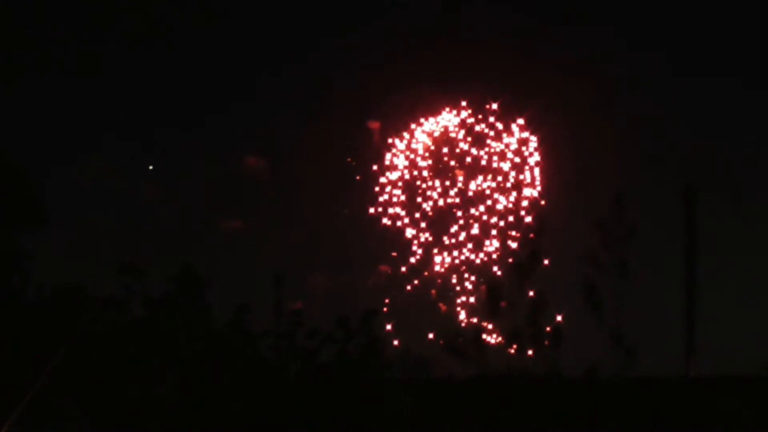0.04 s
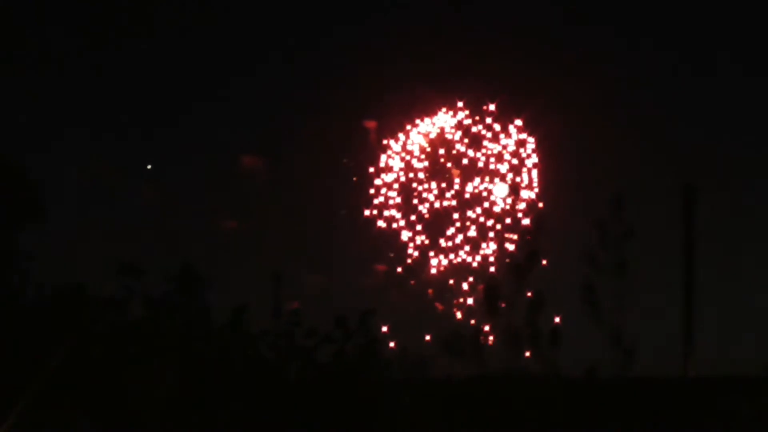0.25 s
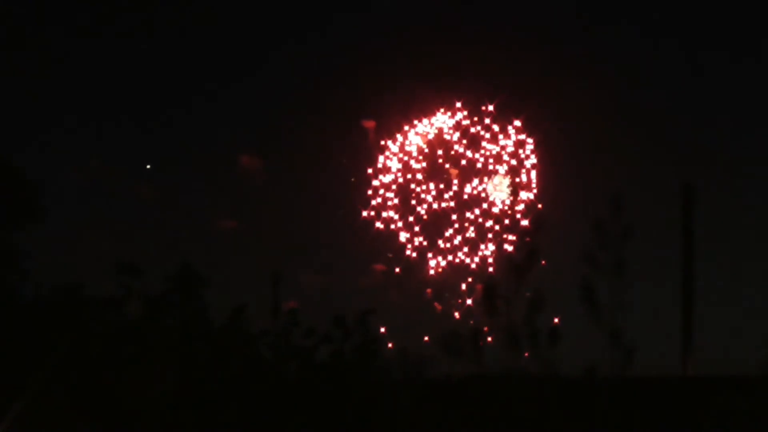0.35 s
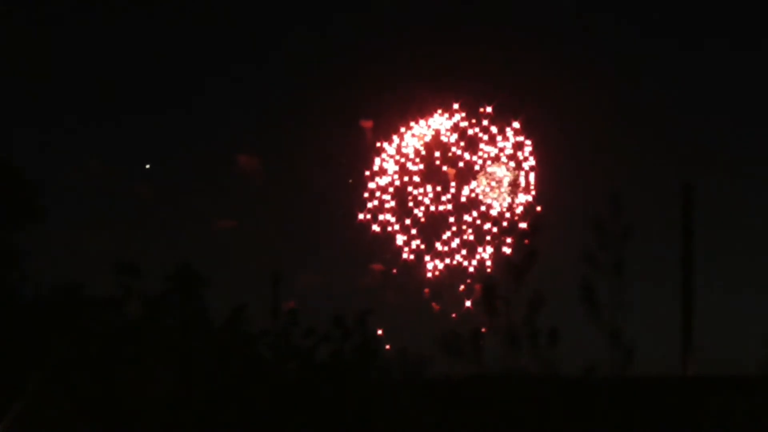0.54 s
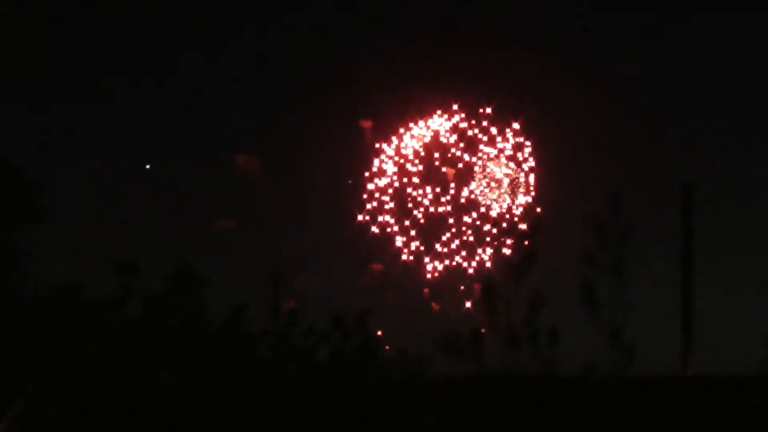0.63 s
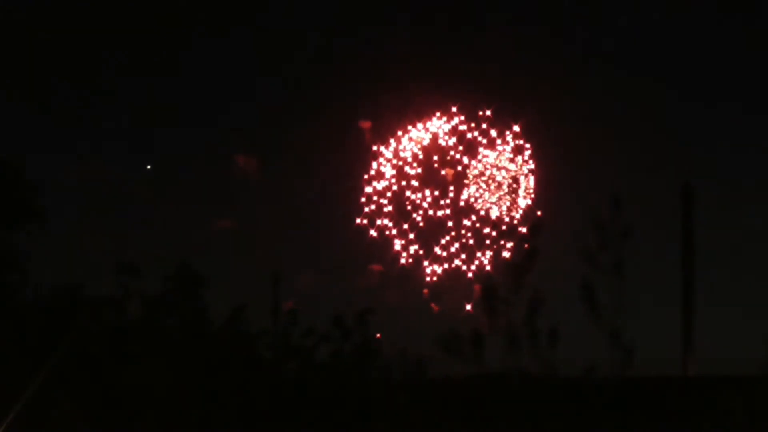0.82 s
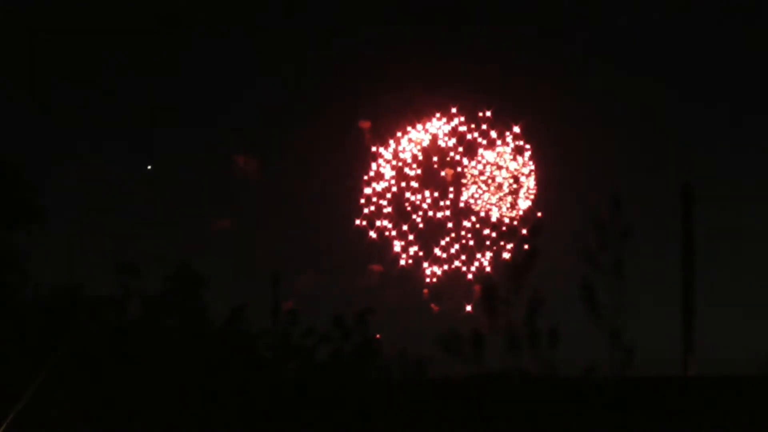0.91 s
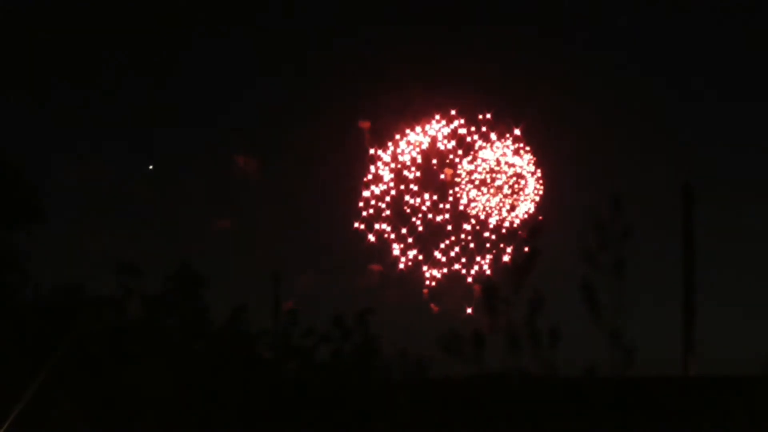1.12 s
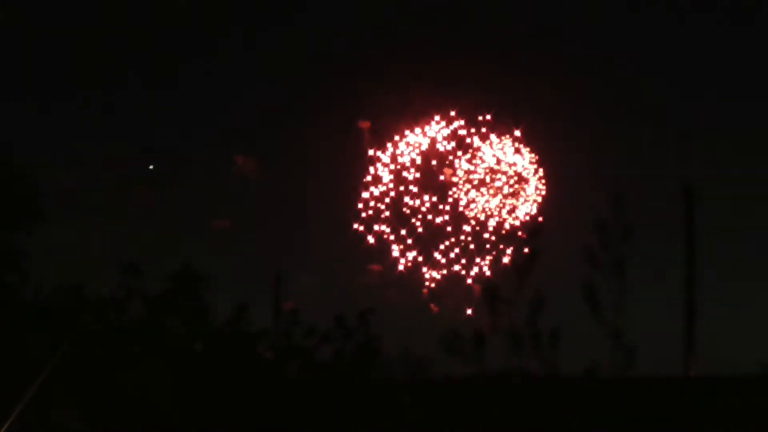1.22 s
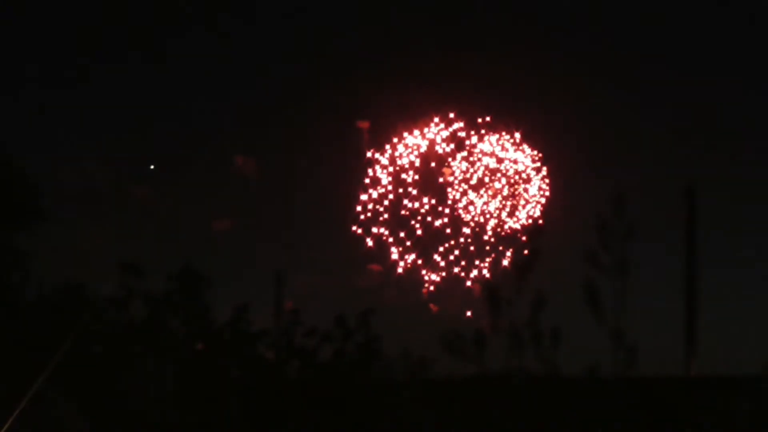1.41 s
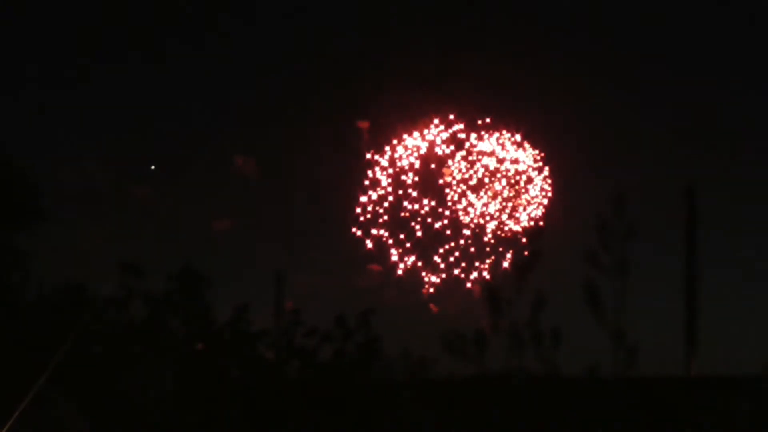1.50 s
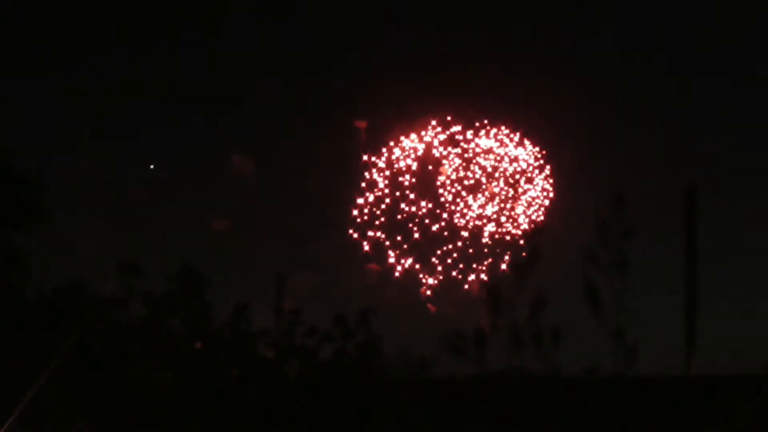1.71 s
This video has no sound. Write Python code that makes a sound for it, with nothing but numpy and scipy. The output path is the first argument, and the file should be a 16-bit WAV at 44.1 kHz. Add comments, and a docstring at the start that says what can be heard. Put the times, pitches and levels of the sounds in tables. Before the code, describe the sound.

Distant fireworks outdoors at night: after a brief quiet of far traffic hum and faint hiss, a loud bang overloads the stereo microphone, rumbling back in echoes, followed by two progressively weaker, duller bursts.

```python
"""Night air over a city, heard by a microphone pair: far traffic and hiss, then a large firework shell bursts
far away and high up. Its shock, a blast wave dulled by the air, drives the recorder into clipping and rolls
back from buildings and ground as random weak echoes (rumble) and short trains of rounded cycles (thumps). A
faint tick rings close by, a smaller, duller shell bursts, then a third, weaker still, and a last tick follows
in the fading rumble. A limiter of limited depth holds the peaks down."""
import sys
import numpy as np
from scipy import signal
from scipy.fft import rfft, irfft, next_fast_len
from scipy.io import wavfile
from scipy.ndimage import uniform_filter1d, minimum_filter1d

SR = 44100
rng = np.random.default_rng(int(sys.argv[2]) if len(sys.argv) > 2 else 0)


def materialize(psi):
    """Save the field psi as 16-bit PCM at rate SR to the path in sys.argv[1].

    A 1-D psi becomes a single channel; in a 2-D psi each row is a channel.
    """
    bounded = np.clip(np.atleast_2d(psi).T, -1, 1)
    quanta = np.round(bounded * 32767).astype(np.int16)
    wavfile.write(sys.argv[1], SR, quanta)


def how_loud(loudness_db):
    """Turn decibels into a plain amplitude multiplier (0 dB gives 1, 20 dB gives 10)."""
    steps = np.asarray(loudness_db, float) / 20
    return 10 ** steps


N = 77175  # samples, 1.75 s

# Spectrum of the hiss, only its shape counts: (f/Hz, level/dB)
HISS_SPECTRUM = [(1300, -35), (2200, -9), (2800, -9), (4000, -2.5), (5200, -9), (6100, -10), (7700, -3.5),
                 (9500, -5), (10800, -3.5), (11300, -1.5), (11800, -6), (12500, -4), (12950, 1),
                 (13400, -6.5), (14500, -12.5), (15600, -18.5), (16000, -40)]
# Spectrum of the far traffic, only its shape counts: (f/Hz, level/dB)
CITY_SPECTRUM = [(18, -49.5), (30, -17.5), (229, 4), (802, -14.5), (959, -13.5), (1060, -28), (1190, -19.5),
                 (1400, -28.5), (3500, -44), (4550, -62.5), (7700, -120)]
# Correlation of left and right for city and rumble: (f/Hz, likeness 0..1)
LIKENESS = [(30, 1), (60, .93), (130, 1), (290, 0.89), (640, 0.67), (1400, 0.41), (3000, 0.067)]
# Left-right balance of all coloured noise: (f/Hz, left over right/dB)
LEANING = [(60, -1), (250, 0.9), (500, -1.5), (1000, -1.1), (2500, -1.5)]
# Ticks close by: (t/s, level/dB, left over right/dB, pitch factor)
TICKS = [(.617, -38.5, 8, 1.0), (1.467, -44, 15.5, 1.345)]
# Ringing modes of a tick at pitch factor 1: (f/Hz, level/dB, 60 dB decay time/s)
TICK_MODES = [(4800, 0, .011), (5150, -6, .008), (4200, -10, .006), (6650, -12, .012), (8380, -8, .009),
              (9390, -12, .01), (3300, -10, .006)]
# Spectrum of the far echoes, only its shape counts: (f/Hz, level/dB)
RUMBLE_SPECTRUM = [(12, -64.5), (20, -22), (54, -9), (101, -5), (128, -2), (235, -1), (292, -5.5),
                   (469, -6.5), (723, -17), (1210, -29.5), (1790, -53.5), (3500, -87.5), (4550, -100),
                   (7700, -120)]
# Level of the returning echoes, before the gusts: (t/s, level/dB)
ROLL = [(0, -31.5), (.15, -32.5), (.212, -28), (.226, -20), (.236, -4), (.255, -8), (.3, -10.5),
        (.37, -13.5), (.44, -12.5), (.54, -13.5), (.595, -17), (.64, -15), (.692, -18.5), (.702, -9),
        (.79, -17.5), (.9, -18.5), (1.02, -19), (1.1, -20), (1.2, -23), (1.243, -24), (1.256, -14.5),
        (1.29, -21), (1.345, -23.5), (1.38, -20), (1.46, -25), (1.6, -26), (1.75, -27.5)]
# Strong far echoes, before the channel spread: (t/s, level/dB, f/Hz, cycles)
THUMPS = [(0.2337, 7, 169, 0.83), (0.278, -5, 340, 1.25), (0.3197, -3, 316, 1.08),
          (0.447, -4.5, 102.7, 7.6), (0.601, -4, 170, 3.1), (.704, -5.5, 197, 2), (0.737, -6, 222, 1.8),
          (.80, -10.5, 177.4, 2.9), (1.041, -8, 202, 5.2), (1.263, -3, 188.4, 2.66),
          (1.279, -11, 138, 1.14), (1.36, -11, 152.7, 4.2)]
# Shell bursts: (t/s, level/dB, positive phase/s, air low-pass f/Hz, sharp front re burst level/dB)
SHELLS = [(0.21995, 15, .0017, 1900, -26), (0.6966, 5, .0013, 950, -35), (1.2502, -1, .0018, 1000, -70)]
# Ground and closest walls: (delay/s, level/dB, left over right/dB, extra delay of left/s, low-pass f/Hz)
NEAR_REFLECTIONS = [(.0037, -12, 0, .0001, 1500), (.0045, -5, 0, .0009, 1600), (.0083, -15, -2, .0027, 900),
                    (.0132, -13, 2, -.0001, 800)]
# Polarity of each near reflection: (sign)
NEAR_SIGNS = [-1, 1, 1, 1]

TIME = np.arange(N) / SR
LEFT_RIGHT = np.array([[1], [-1]])  # sign of a channel difference


def dull(x, cut_hz, order=2):
    """Butterworth low-pass: distance and soft surfaces take the treble."""
    return signal.sosfilt(signal.butter(order, min(cut_hz, .45 * SR), fs=SR, output="sos"), x)


def at_hz(points, hz):
    """A table over frequency, read on a log-frequency axis."""
    table_hz, values = np.transpose(points)
    return np.interp(np.log(hz + 1), np.log(table_hz), values)


def coloured(x, spectrum, likeness):
    """Mid and side signals given a causal (minimum-phase) colour, mixed to a stereo pair of rms 1."""
    size = next_fast_len(N + SR // 2)
    hz = np.arange(size // 2 + 1) * SR / size
    # folding the cepstrum onto positive time makes the filter minimum-phase
    cepstrum = irfft(np.log(how_loud(at_hz(spectrum, hz)) + 1e-7), size)
    cepstrum[1:size // 2] *= 2
    cepstrum[size // 2:] = 0
    mid, side = rfft(x, size) * np.exp(rfft(cepstrum))
    alike = np.clip(likeness(hz), 0, 1)
    pair = np.sqrt(1 + alike) * mid + np.sqrt(1 - alike) * side * LEFT_RIGHT
    lean = how_loud(at_hz(LEANING, hz) / 2 * LEFT_RIGHT)
    out = irfft(lean * pair, size)[:, :N]
    return out / np.sqrt(np.mean(out ** 2))


def hiss():
    """Night air and preamplifier: steady noise, nearly independent in the two channels."""
    level_db, likeness = -63, 0.051
    noise = rng.standard_normal((2, N))
    return how_loud(level_db) * coloured(noise, HISS_SPECTRUM, lambda hz: likeness + 0 * hz)


def city():
    """Far traffic: steady coloured noise, most alike in both channels in the bass."""
    level_db = -34.5
    noise = rng.standard_normal((2, N))
    return how_loud(level_db) * coloured(noise, CITY_SPECTRUM, lambda hz: at_hz(LIKENESS, hz))


def ticks():
    """Something small and hard is touched close by: its modes ring briefly and die exponentially."""
    rise_s = 0.00098
    out = np.zeros((2, N))
    for start, db, pan_db, pitch in TICKS:
        t = np.clip(TIME - start, 0, None)
        ring = np.zeros(N)
        for hz, level_db, t60 in TICK_MODES:
            ring += how_loud(level_db - 60 * t / t60) * np.sin(2 * np.pi * hz * pitch * t)
        out += how_loud(db + pan_db / 2 * LEFT_RIGHT) * ring * np.minimum(t / rise_s, 1)
    return out


def rumble():
    """Countless weak echoes of uneven size, dulled by distance, swelling and sinking in gusts."""
    echoes_per_s, size_spread_db = 2500, 2
    gust_db, gusts_per_s = 0.85, 12
    sizes_db = size_spread_db * np.minimum(rng.exponential(1, (2, N)), 5)
    signs = rng.choice([-1, 1], (2, N))
    arrives = rng.random((2, N)) < echoes_per_s / SR
    echoes = how_loud(sizes_db) * signs * arrives
    gust = np.interp(TIME * gusts_per_s, np.arange(100), rng.standard_normal(100))
    level_db = np.interp(TIME, *np.transpose(ROLL)) + gust_db * gust
    return how_loud(level_db) * coloured(echoes, RUMBLE_SPECTRUM, lambda hz: at_hz(LIKENESS, hz))


def thumps():
    """Large far surfaces send the blast back as a few rounded cycles, each with a random offset in level and
    timing between the channels."""
    # random offsets between the channels; the earlier channel is the weaker one
    spread_db, spread_s = -2, 0.0002
    out = np.zeros((2, N))
    for start, db, hz, cycles in THUMPS:
        side = rng.standard_normal() * LEFT_RIGHT
        progress = np.clip((TIME - start + spread_s * side) * hz / cycles, 0, 1)
        swell = np.sin(np.pi * progress) ** 2
        out += how_loud(db + spread_db * side) * swell * np.sin(2 * np.pi * cycles * progress)
    return out


def shock(start, phase_s, fade):
    """Blast wave: a jump in pressure that falls through zero into a suction phase."""
    u = (TIME - start) / phase_s
    return np.where(u >= 0, (1 - u) * np.exp(-fade * np.clip(u, 0, 200)), 0)


def folded(start, phase_s):
    """A reflected blast, folded into an even N-shaped wave."""
    u = (TIME - start) / phase_s
    return np.where((u >= 0) & (u < 2), 1 - u, 0)


def shells():
    """Each shock arrives directly, then again off the ground and the closest walls, dulled by the air."""
    front_hz, fade = 5000, 1.2  # fade per positive phase
    out = np.zeros((2, N))
    for start, db, phase_s, air_hz, front_db in SHELLS:
        wave = shock(start, phase_s, fade) * np.ones((2, 1))
        out += how_loud(db + front_db) * dull(wave, front_hz)  # the sharp front that survives
        for sign, (delay, loss_db, pan_db, lag, cut_hz) in zip(NEAR_SIGNS, NEAR_REFLECTIONS):
            left = how_loud(pan_db / 2) * folded(start + delay + lag, phase_s)
            right = how_loud(-pan_db / 2) * folded(start + delay, phase_s)
            wave = wave + sign * how_loud(loss_db) * dull(np.array([left, right]), cut_hz)
        out += how_loud(db) * dull(dull(wave, air_hz), air_hz, order=4)
    return out


def scene():
    """All sources at the microphone pair."""
    return shells() + thumps() + rumble() + city() + ticks() + hiss()


def roll_off(x):
    """The treble ends steeply here."""
    return signal.sosfilt(signal.butter(12, 15900, fs=SR, output="sos"), x)


def record(dry):
    """Microphone bass cut, look-ahead limiter of limited depth, hard overload beyond it."""
    mic_low_hz = 46.3
    limit_db, depth_db, look_ahead_s, recover_db_per_s = -.4, 5, .004, 85
    x = signal.sosfilt(signal.butter(3, mic_low_hz, "high", fs=SR, output="sos"), dry)
    peak_db = 20 * np.log10(np.abs(x).max(axis=0) + 1e-9)  # the louder channel steers both
    over_db = np.clip(peak_db - limit_db, 0, depth_db)
    # hold each peak, then let the gain recover at a steady rate
    ramp = recover_db_per_s * TIME
    held_db = np.maximum(np.maximum.accumulate(over_db + ramp) - ramp, 0)
    ahead = int(look_ahead_s * SR)
    gain_db = minimum_filter1d(-held_db, 2 * ahead + 1)
    gain_db = uniform_filter1d(uniform_filter1d(gain_db, ahead), ahead)
    mix = np.clip(x * how_loud(gain_db), -1, 1)
    return roll_off(mix)


dry = scene()
out = record(dry)
materialize(out)
```